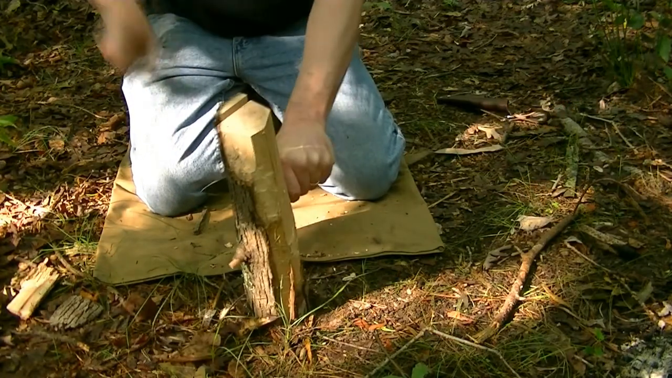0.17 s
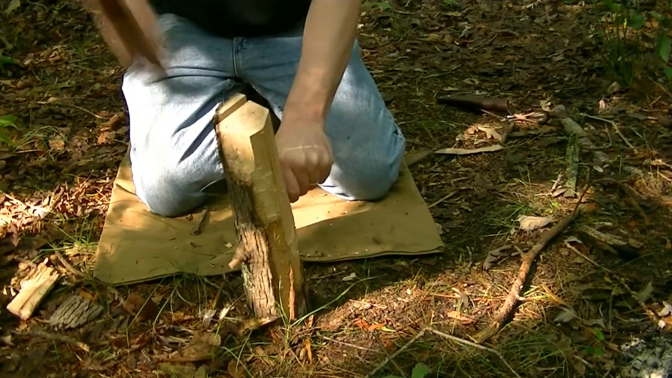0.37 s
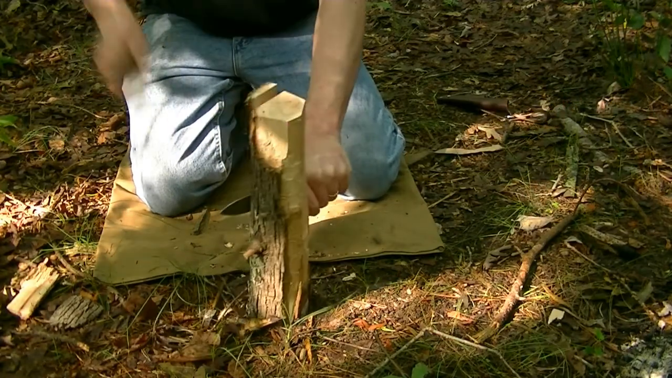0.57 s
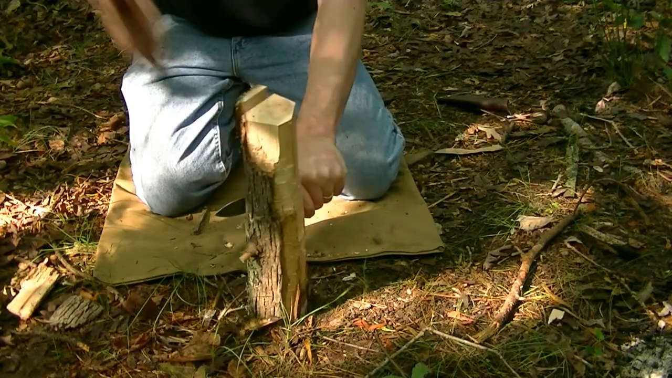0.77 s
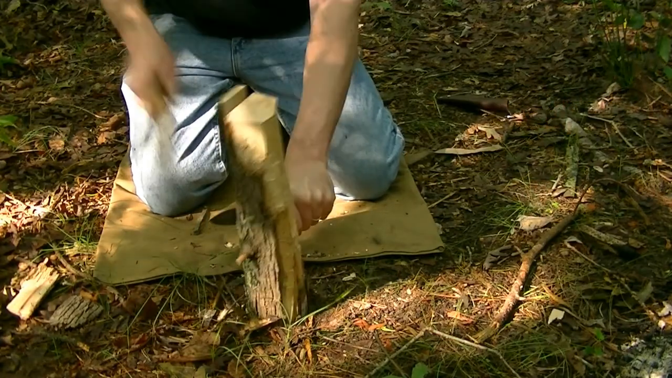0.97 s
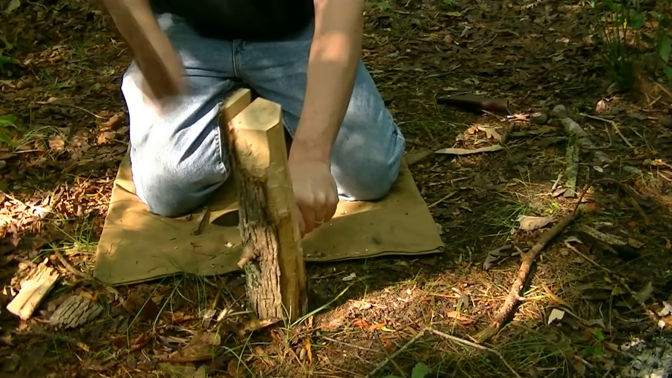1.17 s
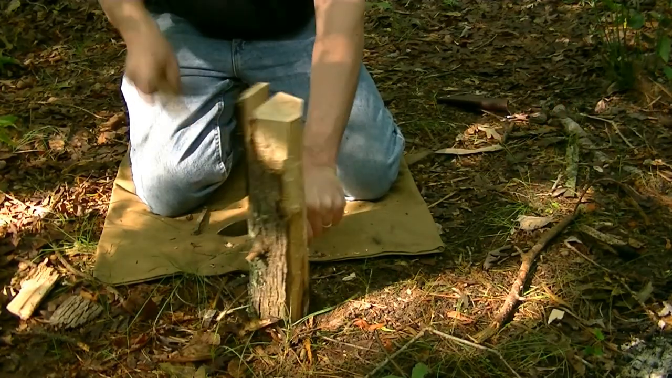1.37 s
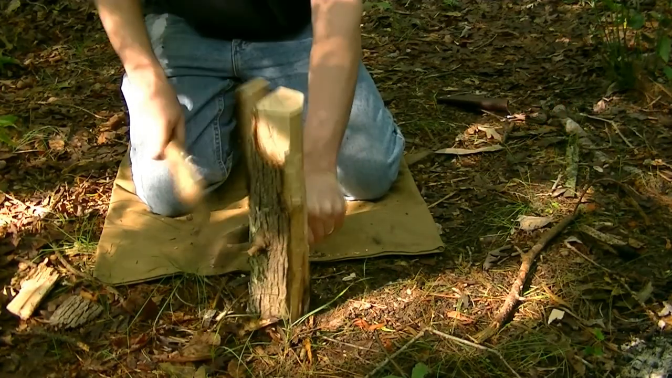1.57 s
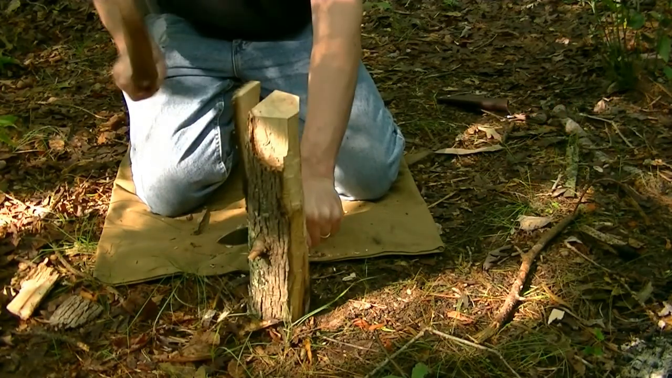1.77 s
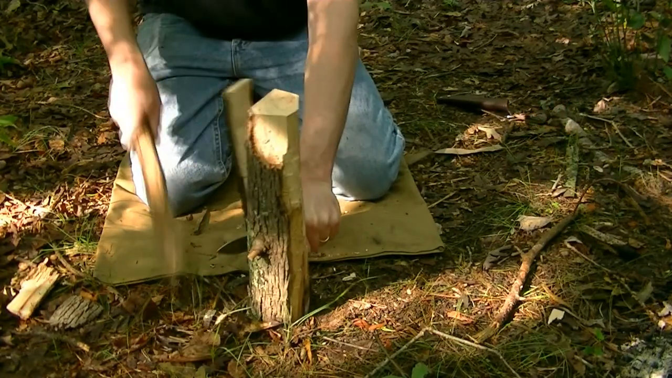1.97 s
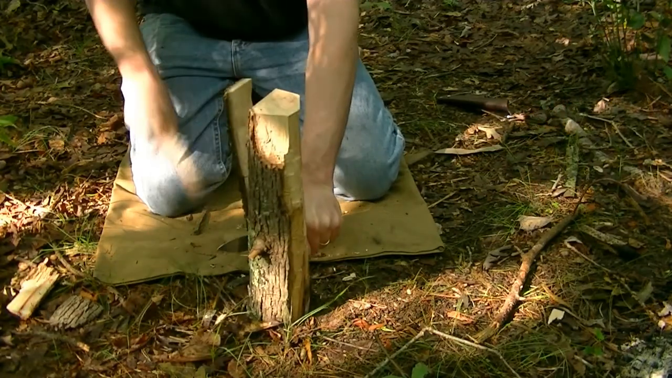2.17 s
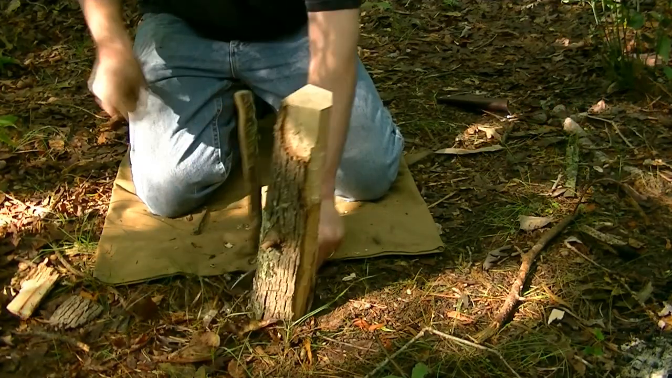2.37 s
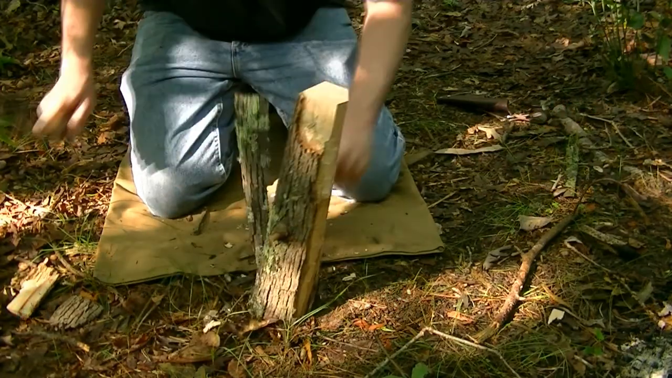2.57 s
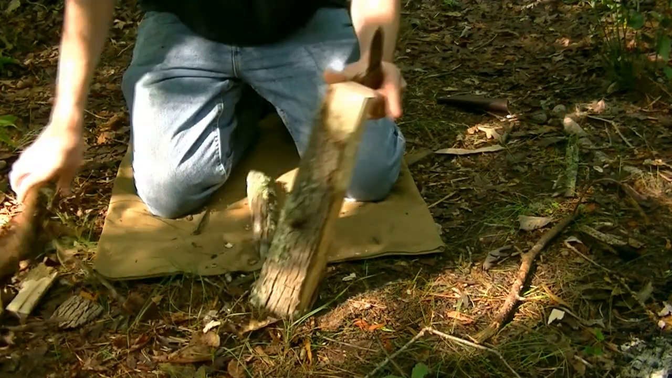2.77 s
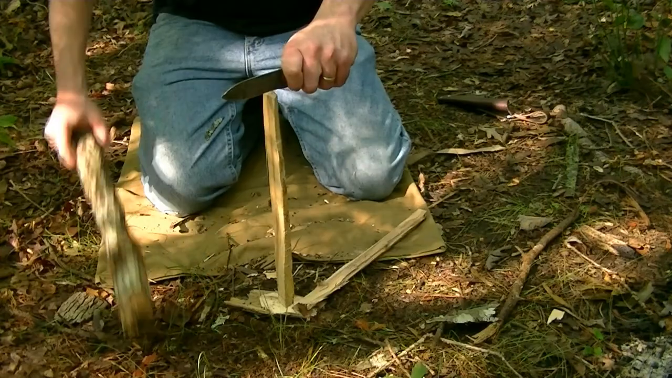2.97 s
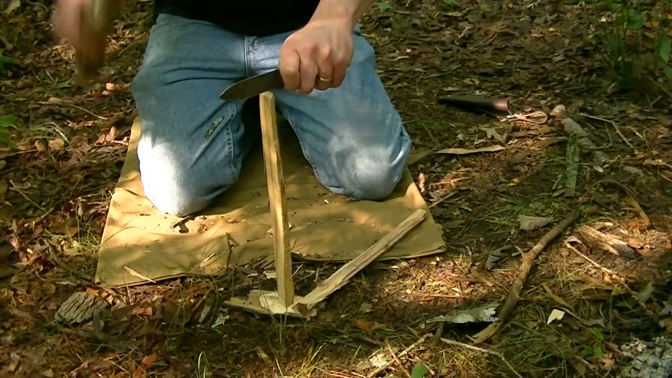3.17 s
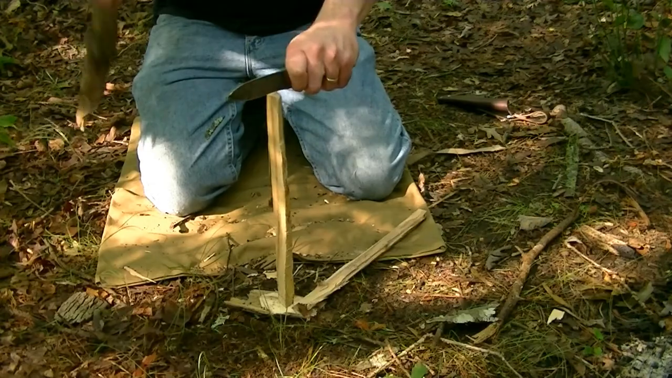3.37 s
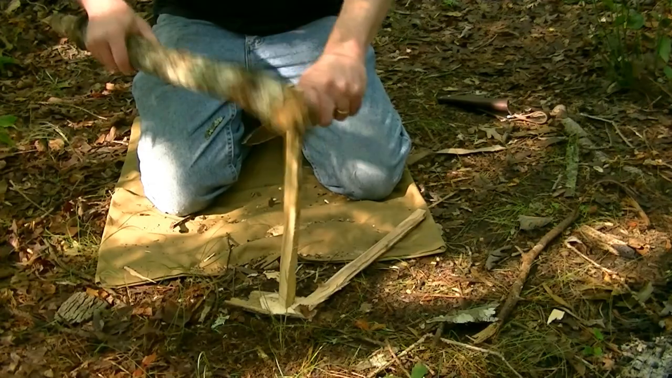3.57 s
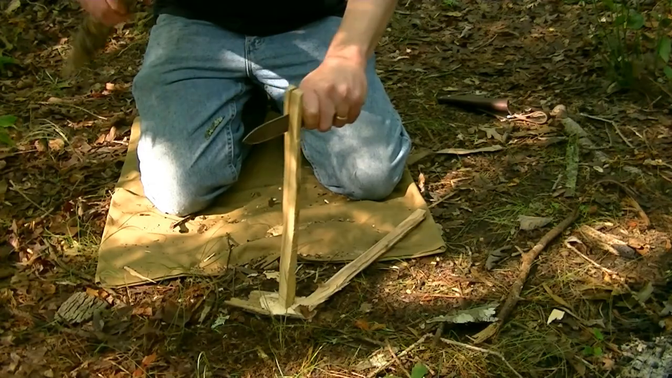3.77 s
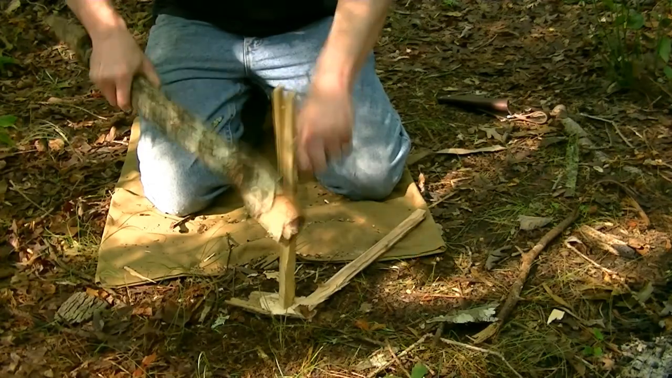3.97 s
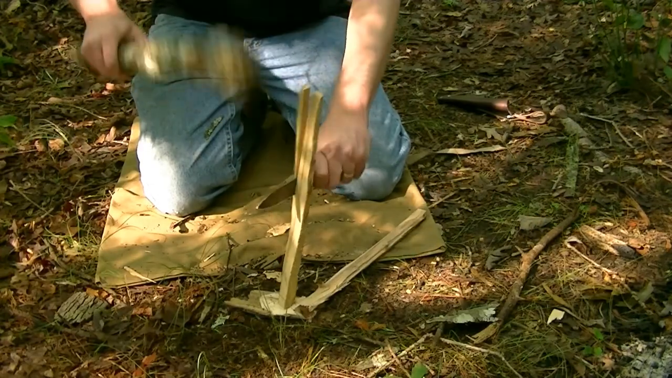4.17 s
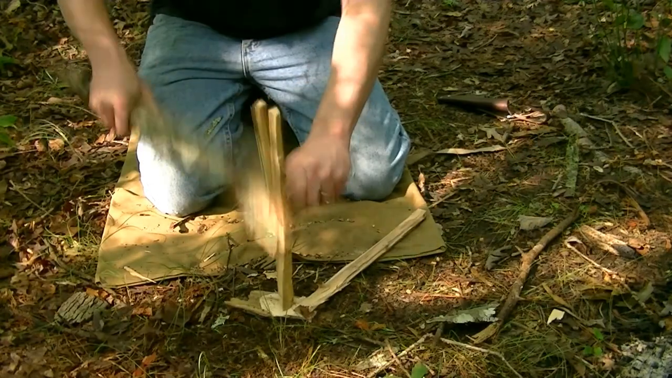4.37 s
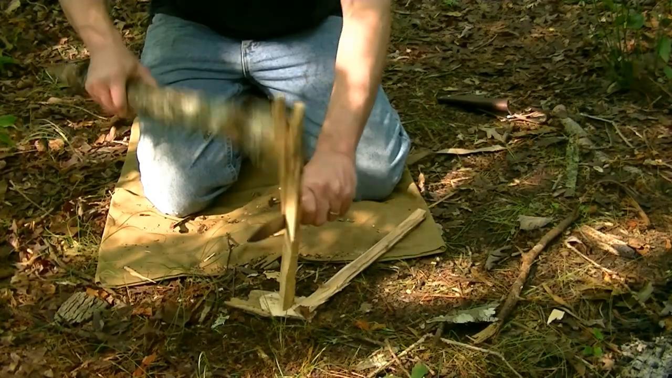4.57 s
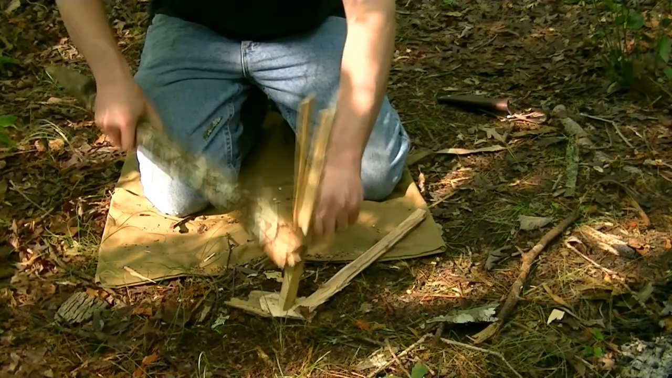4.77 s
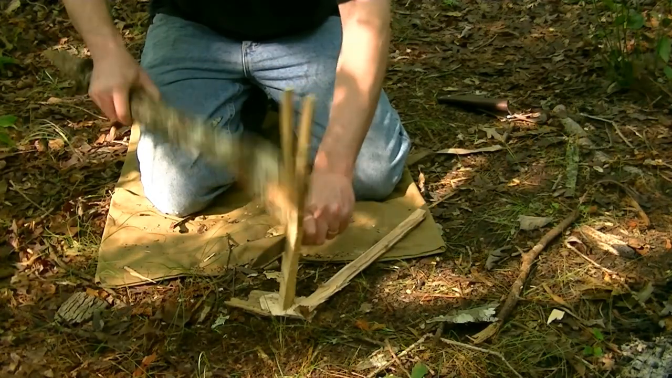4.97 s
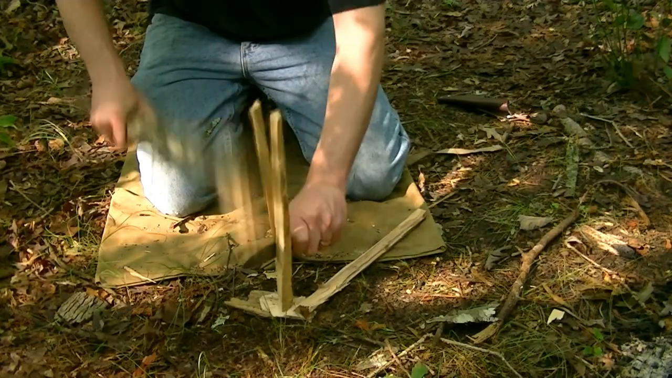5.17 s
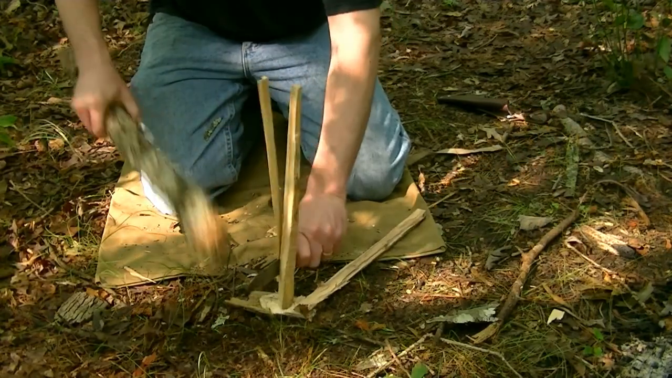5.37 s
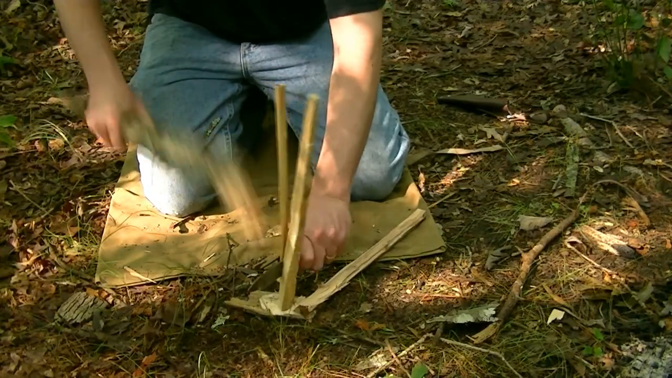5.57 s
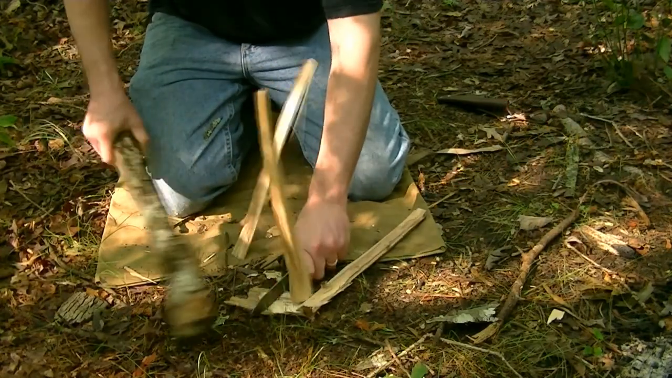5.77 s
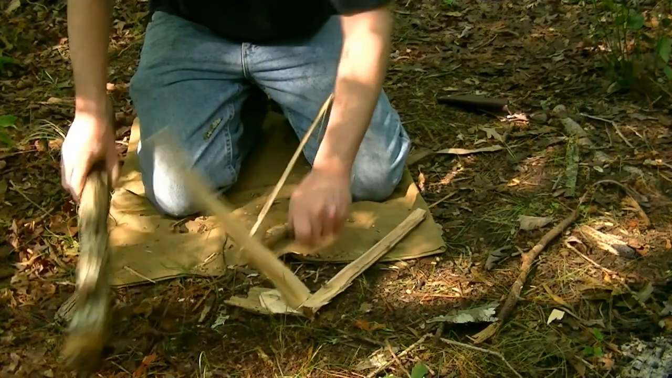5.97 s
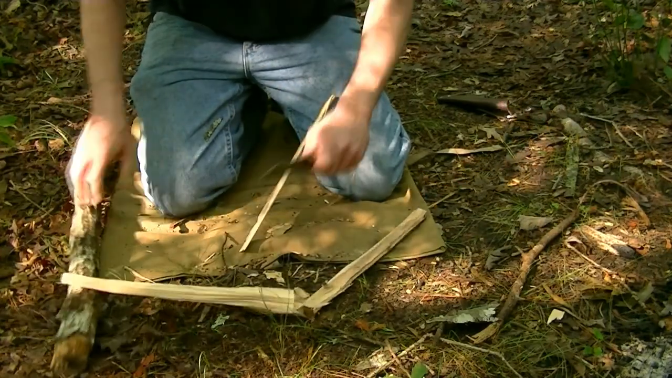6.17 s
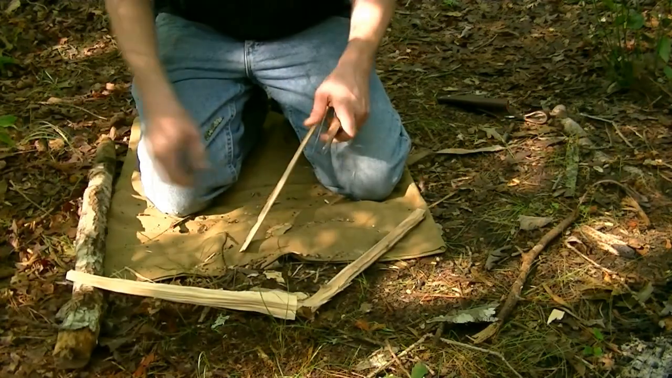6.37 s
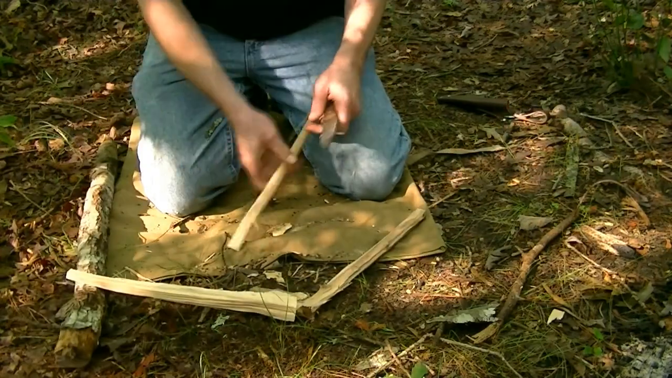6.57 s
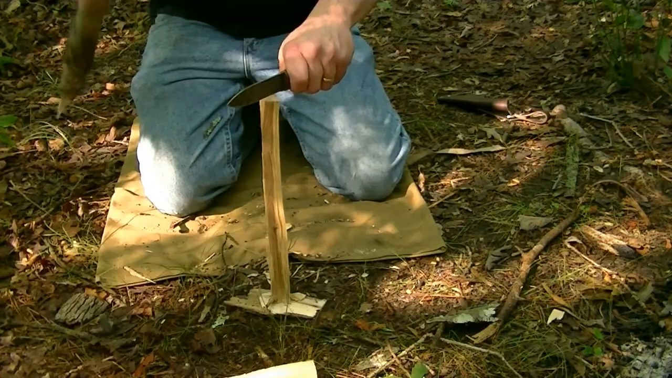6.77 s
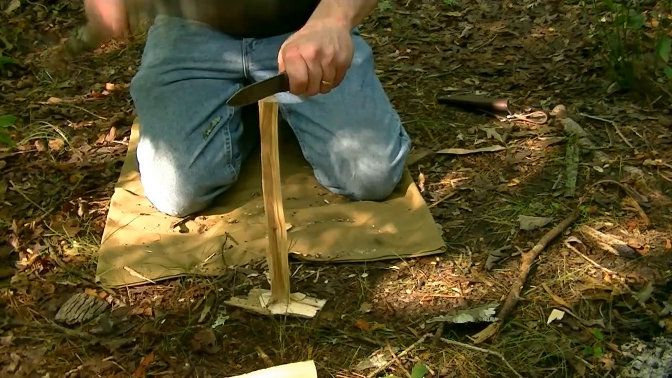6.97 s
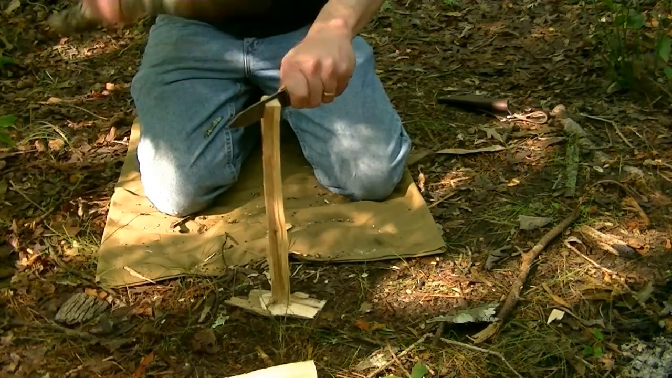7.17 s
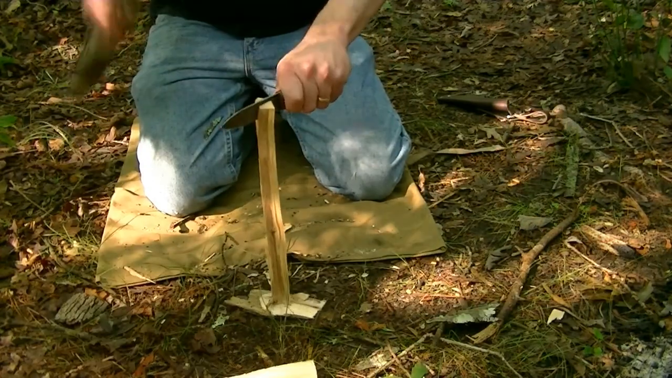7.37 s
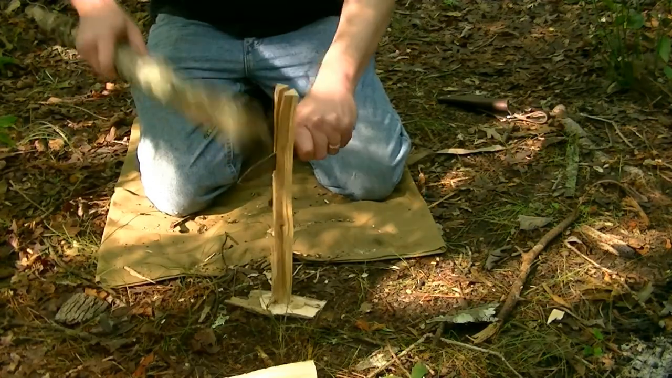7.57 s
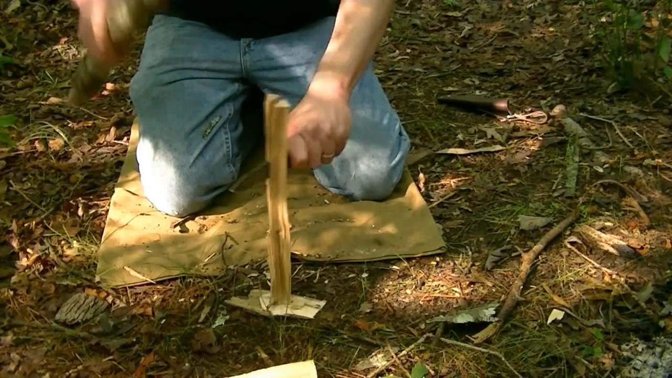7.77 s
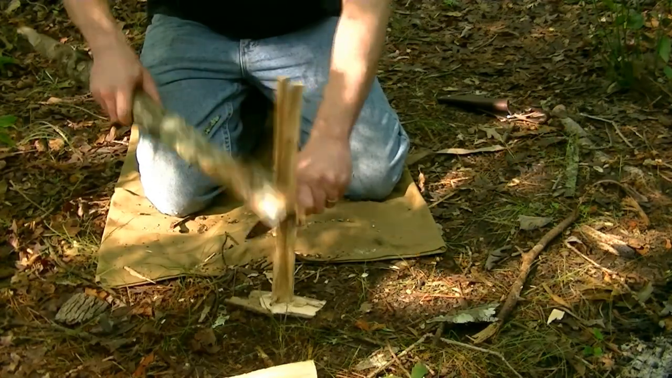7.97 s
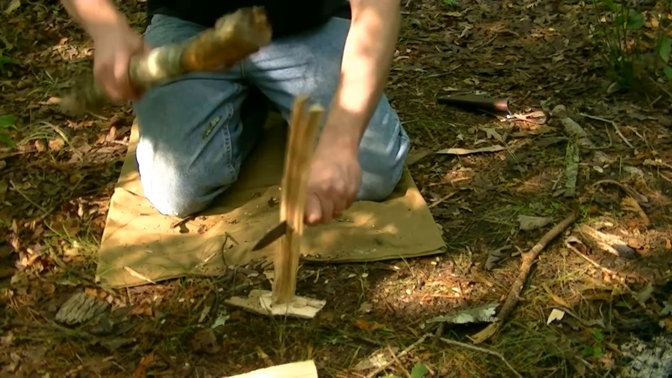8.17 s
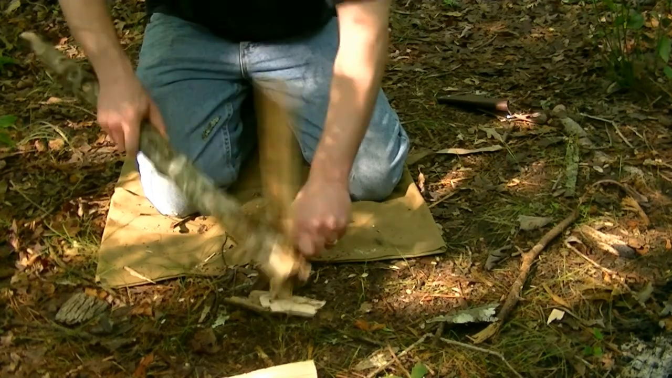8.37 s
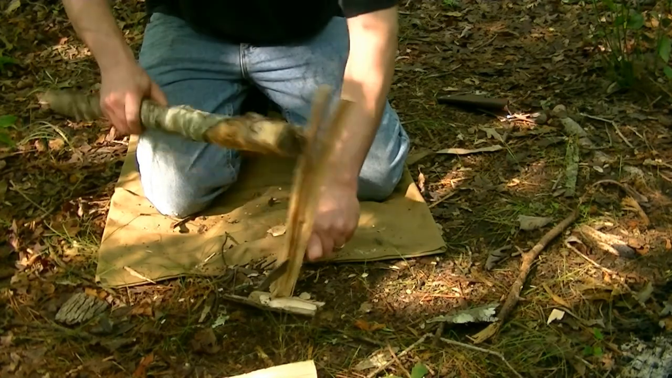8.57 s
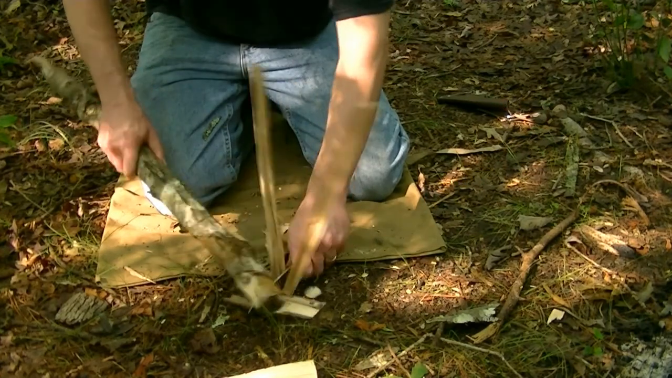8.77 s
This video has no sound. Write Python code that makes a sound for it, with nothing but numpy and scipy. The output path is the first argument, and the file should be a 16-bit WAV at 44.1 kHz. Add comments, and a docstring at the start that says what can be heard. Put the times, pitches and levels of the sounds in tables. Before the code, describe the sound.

Sharp, dry baton blows split wood at a steady pace outdoors, with crackling tears, loose clacks and a high insect chirr behind.

```python
"""Forest floor among trees, two microphone ports close to the work.
A wooden baton drives a knife through an upright log, then through thin sticks.
Blows ring decaying wood modes and thump the ground; fibres tear as dense filtered clicks; small knocks follow.
The trees return a faint echo of scattered clicks. Insects, pulsed narrow noise, chirr near 7 kHz
throughout; a broad insect hiss, coloured noise, is heard only up to an abrupt cut near 3 s."""
import sys
import numpy as np
from scipy import signal
from scipy.fft import rfft, irfft, next_fast_len
from scipy.io import wavfile

SR = 44100
rng = np.random.default_rng(int(sys.argv[2]) if len(sys.argv) > 2 else 0)


def pcm_store(signal):
    """Save signal as 16-bit PCM."""
    levels = np.round(np.clip(np.atleast_2d(signal), -1, 1) * 32767)
    wavfile.write(sys.argv[1], SR, levels.astype(np.int16).T)


N = 389403

# low, middle and high register of the wood: from_hz, to_hz
REGISTERS = [(280, 740), (960, 1770), (1950, 3360)]
# baton on the blade's back, in the log; bass and treble relative to the middle register:
# start_s, level_db, bass_db, treble_db, middle_mode_hz, high_mode_hz, high_mode_share (0-1),
# echo_send_db, graze_ahead_s
LOG_BLOWS = [(.0038, -25.5, 0, 1.5, 1085, 3050, .08, 0, 0.001),
             (0.4139, -21, -9, -3, 1560, 2950, 0.9, -5, 0.0016),
             (0.8319, -19, -16, -1, 1410, 2680, 0.56, -1, 0),
             (1.2053, -22, -6, -0.5, 1267, 2160, 0.58, -0.5, .003),
             (1.554, -22.5, -4.5, 1.5, 1296, 2240, 0, -1.5, 0.0022),
             (1.8687, -26, -3.5, 5, 1223, 2390, 0.16, 0, .004),
             (2.1903, -20.5, -9.5, -0.5, 1434, 2269, 0.03, -3, .0083)]
# the same in the sticks: start_s, level_db, bass_db, treble_db, middle_mode_hz, middle_mode_share (0-1),
# echo_send_db, tearing_db, tearing_length_s
STICK_BLOWS = [(3.47, -20.5, -7.5, -10, 1319, .25, 2, -37, .035),
               (3.9325, -20, -8.5, -4, 1560, 0.3, -1.5, -34, 0.043),
               (4.3721, -21, -8, .5, 1198, 0.3, -1, -37, 0.031),
               (4.7616, -24.5, 2, -2.5, 1300, .48, -4, -27, 0.013),
               (5.2033, -21, -4, -6, 1306, .5, -4.5, -34, 0.024),
               (5.613, -18.5, -9, -7.5, 1388, .12, -3.5, -35, 0.016),
               (6.978, -18, -12.5, -7.5, 1272, .88, -2, -61, .01),
               (7.4023, -23.5, -6.5, -1, 1248, 0.72, -3, -35, 0.041),
               (7.832, -24.5, -3.5, -13, 1690, 0.5, -5, -29.5, .027),
               (8.2536, -21.5, -6.5, -10, 1266, 0.89, -11, -34, .036),
               (8.68, -30, 3, -19.5, 1370, 0.34, -6, -35, 0.02)]
# light wooden knocks: loose pieces touching or landing, and a soft graze just before a blow:
# start_s, level_db, bass_db, treble_db, middle_mode_hz, high_mode_hz
LIGHT_KNOCKS = [(.905, -45, -7.5, -6, 1550, 2440), (2.236, -55.5, 11.5, 12, 1499, 2700),
                (2.285, -56.5, 7.5, 12.5, 1252, 2700), (2.717, -39.5, 4.5, 8, 1566, 2400),
                (2.796, -33, -4.5, -15, 1470, 2700), (5.748, -56.5, 5, 0, 1000, 2046),
                (6.008, -32, 2.5, -12.5, 1200, 1998), (6.047, -47, 3, 2.5, 1204, 2260),
                (6.1349, -21.5, -12, -13.5, 1225, 2110), (6.146, -37, 1, 1.5, 1620, 3225),
                (8.237, -40, -7, -6, 1292, 2110)]
# dull low wooden knocks: heavy wood bumping down, and the low ring of a late blow;
# knock and thump relative to the level:
# start_s, level_db, low_mode_hz, low_mode_share (0-1), knock_db, thump_db
DULL_KNOCKS = [(2.7219, -24.5, 280, 0.28, -14, -11), (2.911, -39, 398, .1, -22, -12),
               (5.102, -45, 291, 0.64, -1.5, -3), (5.1165, -36, 286, 0.66, -14.5, -6.5),
               (5.6282, -35.5, 388, .44, 0, -7), (6.045, -46.5, 231, .3, -4, 11),
               (8.698, -34.5, 443, 0.74, -14, -11.5)]
# ringing modes of the log, the sticks, and the light and dull knocks, before random changes of strength:
# pitch_hz, relative_db, t60_s
LOG_MODES = [(600, -5, 0.033), (747, 4, 0.043), (894, 4.5, 0.017), (1251, -12.5, 0.033), (1510, -10, 0.02),
             (1790, 3.5, 0.024), (1970, -7.5, 0.0028), (2440, 1.5, 0.015), (2800, -11, 0.025),
             (3100, -26, 0.013)]
STICK_MODES = [(453, -3.5, .04), (584, 0, 0.027), (762, 1.5, 0.02), (1216, 0, 0.022), (1380, -7.5, 0.029),
               (1665, 2, 0.028), (2220, 3.5, 0.014), (2320, 0.5, 0.03), (2860, -1, 0.023),
               (3290, -15.5, 0.05)]
SMALL_KNOCK_MODES = [(305, 0.5, 0.014), (477, -4.5, 0.082), (634, -7.5, .04), (816, -5, 0.022),
                     (1296, -6, 0.11), (1480, 2, 0.09), (1730, 0, 0.03), (2200, -9.5, 0.047),
                     (2620, -12, .04), (3240, 2.5, 0.079)]
# the log gives way: start_s, level_db, length_s
LOG_SPLIT = (2.186, -43.5, .046)
# thick fibres and twigs snapping, before the common snap gain: start_s, relative_db
SNAPS = [(1.91, -23.5), (3.4726, -9), (3.493, -18), (3.959, -15.5), (5.619, -9.5), (5.779, -31),
         (5.895, -31), (7.415, -8), (7.8337, -9), (7.8402, -11), (7.855, -17), (7.87, -16.5), (8.24, -27),
         (8.2713, -9), (8.371, -18), (8.697, -11.5), (8.755, -22)]
# knees and hands stir the dry litter: start_s, level_db, hold_s
STIRS = [(0, -57, .2), (2.712, -47, 0.053), (5.107, -51.5, 0.017), (5.744, -50.5, .03),
         (6.02, -47.5, 0.011), (6.584, -66.5, 0.021), (8.76, -57.5, 0.036)]
# noise colours of tearing fibre, crushed bark, dry litter, tree echo, forest air and insect hiss:
# frequency_hz, relative_db
FIBRE = [(60, -32), (600, -8), (1500, -3), (3000, -5), (4200, -7), (6000, 3.5), (8000, -0.5), (10500, 0),
         (12800, -1.5), (14500, -14), (16000, -21.5)]
CRACK = [(60, -42), (400, -23), (2500, -24.5), (3700, -1), (4600, -1.5), (6000, 0.5), (8000, -6.5),
         (11500, -5), (13500, -11), (16000, -26)]
NEEDLES = [(200, -9.5), (450, 0), (1200, -1), (3000, 0.5), (4500, -4), (6500, -2), (9000, -6),
           (12000, -11.5), (16000, -29)]
ECHO = [(100, -18.5), (400, -13.5), (800, -6.5), (1300, -4), (2000, 1), (2800, 1.5), (4000, 0.5),
        (7000, -10), (12000, -3), (16000, -20.5)]
AIR = [(20, -15.5), (60, -4), (125, 2), (220, -2), (520, 1), (750, -4.5), (1200, -7), (1700, -12),
       (2600, -13.5), (3500, -4), (4100, -7.5), (6100, -2.5), (9000, -35), (14000, -21), (15200, -51.5)]
HISS = [(300, -24.5), (800, -9), (2300, -15), (3000, -7), (3500, -1.5), (4300, -0.5), (5000, 1),
        (5800, 1.5), (7200, -3), (8300, -0.5), (9300, -14.5), (10500, -13.5), (13000, -23), (15000, -37.5)]
# chirring insects, before a common gain: pitch_hz, width_hz, relative_db, pulses_per_s
INSECTS = [(7014, 140, -56.5, 340), (6780, 290, -60, 290), (7420, 270, -62.5, 370), (6550, 210, -65.5, 260),
           (6350, 80, -66.5, 100)]
# thin insect tones within the hiss: pitch_hz, width_hz, level_db, pulses_per_s
HISS_TONES = [(4815, 69, -62, 380), (7200, 70, -66.5, 340)]
# left-right likeness of air, hiss and close sound: frequency_hz, likeness (-1 opposed to 1 alike)
AIR_LIKENESS = [(60, -0.31), (150, -0.03), (380, -0.67), (950, -0.66), (2380, 0.19), (5980, -0.7),
                (15000, 0.79)]
HISS_LIKENESS = [(60, -0.25), (240, -0.57), (950, -0.24), (3770, -0.49), (15000, -0.53)]
HIT_LIKENESS = [(100, 1), (1000, 0.94), (2200, 0.86), (4500, 0.92), (8000, .85), (13000, 0.38)]
# balance of close sound: frequency_hz, left_over_right_db
HIT_BALANCE = [(100, 0.4), (500, 1.05), (1200, 2), (2500, 2.5), (5000, 0.5), (8500, 2.5), (12500, -2)]

HIT_SIZE = SR // 6  # samples kept of each short sound
LEVEL_WINDOW_S = .02  # short sounds are levelled as if their energy filled this time
TIME = np.arange(N) / SR
AGE = TIME[:HIT_SIZE]
GRAZE_LOSS_DB_PER_S = 1697.5  # a loose blade is touched before the blow; the earlier, the lighter
# the first blow seats a new stick in the ground; each later one keeps a share of the extra thump dB
THUMP_DB, SEATING_DB, SEATING_KEPT, NEW_STICK_PAUSE_S = -42.5, 12.5, 0.24, 1
REPEAT_S, REPEAT_LOSS_DB = .076, 27  # each light knock is followed by one much fainter repeat
TEAR_LEAD_S = .0035  # fibres start to give just before the knock
# thinner fibres: offset from the tear's level before the snap gain, reach in tear lengths
SMALL_SNAP_DB, SMALL_SNAP_REACH = 1, 1.6
STIR_RISE_DB_PER_S, STIR_FALL_DB_PER_S, LITTER_REST_DB = 328.5, 171.5, -83.5
BLADE_HZ, BLADE_T60_S, BLADE_HELD_DB, BLADE_FREED_DB = 2690, .7, -55, -37
HISS_END_S, RUMBLE_HZ, CUTOFF_HZ = 2.945, 45, 16800


def log_blows(bass_hz, bass_share, middle_share, thump_db, crack_db):
    """Hard blows into the thick log, some led by a lighter graze."""
    for s, db, bass_db, treble_db, middle_hz, high_hz, share, echo_db, graze_s in LOG_BLOWS:
        pitches = (bass_hz, middle_hz, high_hz)
        shares = (bass_share, middle_share, share)
        for ahead_s in [0, graze_s] if graze_s > 0 else [0]:
            loss = GRAZE_LOSS_DB_PER_S * ahead_s
            levels = db - loss + np.array([bass_db, 0, treble_db])
            yield s - ahead_s, echo_db, thump_db - loss, crack_db - loss, levels, pitches, shares


def stick_blows(bass_hz, high_hz, bass_share, high_share, crack_db):
    """Runs of blows into thin sticks; the thump shrinks once a stick is seated."""
    last_s, seating_db = 0, 0
    for s, db, bass_db, treble_db, middle_hz, share, echo_db, _, _ in STICK_BLOWS:
        new_stick = s - last_s > NEW_STICK_PAUSE_S
        seating_db = SEATING_DB if new_stick else seating_db * SEATING_KEPT
        last_s = s
        levels = db + np.array([bass_db, 0, treble_db])
        pitches = (bass_hz, middle_hz, high_hz)
        shares = (bass_share, share, high_share)
        yield s, echo_db, THUMP_DB + seating_db, crack_db, levels, pitches, shares


def light_knocks(bass_hz, shares, echo_db, thump_db, crack_db):
    """Light wooden knocks ring clearly, each with one much fainter repeat."""
    for s, db, bass_db, treble_db, middle_hz, high_hz in LIGHT_KNOCKS:
        pitches = (bass_hz, middle_hz, high_hz)
        for late_s, loss in (0, 0), (REPEAT_S, REPEAT_LOSS_DB):
            levels = db - loss + np.array([bass_db, 0, treble_db])
            top_db = levels.max()
            yield s + late_s, echo_db, top_db + thump_db, top_db + crack_db, levels, pitches, shares


def dull_knocks(middle_hz, high_hz, middle_share, high_share, treble_db, echo_db, crack_db):
    """Dull low wooden knocks, each with a short higher knock on top."""
    for s, db, low_hz, share, knock_db, thump_db in DULL_KNOCKS:
        levels = db + np.array([0, knock_db, treble_db])
        pitches = (low_hz, middle_hz, high_hz)
        shares = (share, middle_share, high_share)
        yield s, echo_db, db + thump_db, db + crack_db, levels, pitches, shares


def knocks(contacts, modes, body_hz, contact_db, grit_db, grit_t60, main_t60, crack_t60,
           thump_hz, thump_t60, soil_db, echo_tone, echo_treble_db):
    """Each contact rings the wood; bark crushes with a crack and the ground takes the push.
    A contact is start_s, echo_db, thump_db, crack_db, then by register levels_db, pitches_hz, shares (0-1).
    Row 0 is the sound straight ahead, row 1 the sound sent all around."""
    ahead, around = np.zeros((2, N))
    contact = unit_hit(dying(0.00076))
    # neighbouring registers swing in opposite phase, so they join without a gap
    filters = [(sign, signal.butter(2, edges, "band", fs=SR, output="sos"))
               for sign, edges in zip((1, -1, 1), REGISTERS)]
    for s, echo_db, thump_db, crack_db, levels, pitches, shares in contacts:
        strengths = rng.normal(0, 7.4, len(modes))  # dB
        wood = sum(from_db(db + extra_db) * ring(hz, t60)
                   for (hz, db, t60), extra_db in zip(modes, strengths))
        grit = rng.standard_normal((3, HIT_SIZE))
        # one hard pulse starts the knock; between the clear modes lie many faint, quickly damped ones
        faint_modes = from_db(grit_db) * unit_hit(grit[0] * dying(grit_t60))
        wood = unit_hit(wood) + from_db(contact_db) * contact + faint_modes
        # a narrow piece radiates little below its body frequency
        wood = band(wood, body_hz, 9000)
        sends = echo_db + np.array([0, 0, echo_treble_db])
        for db, hz, share, sent_db, (sign, sos) in zip(levels, pitches, shares, sends, filters):
            # one bending mode leads each register
            share = np.clip(share, 0, 1)
            lead = unit_hit(ring(hz, main_t60 * (1300 / hz) ** 0.35) * (1 - dying(0.0023)))
            rest = unit_hit(signal.sosfilt(sos, wood))
            tone = unit_hit(np.sqrt(share) * lead + np.sqrt(1 - share) * rest)
            add(ahead, s, sign * from_db(db) * tone)
            # summed over all directions the modes even out
            even = unit_hit(signal.sosfilt(sos, contact + 1e-18))
            add(around, s, sign * from_db(db + sent_db) * unit_hit(echo_tone * tone + even))
        crack = from_db(crack_db) * unit_hit(colour(grit[1] * dying(crack_t60), CRACK))
        soil = from_db(soil_db) * unit_hit(band(grit[2] * dying(0.12), 99, 230))
        thump = unit_hit(ring(thump_hz, thump_t60) * (1 - dying(0.059))) + soil
        add(ahead, s, crack + from_db(thump_db) * unit_hit(band(thump, 85, 700)))
        add(around, s, crack)
    return np.array([ahead, around])


def splitting(fibres_per_s, spread_db, fade_t60, snap_t60, snap_db, count):
    """The split runs as a dense crackle; thicker fibres let go with single snaps."""
    out, snaps = np.zeros(N), list(SNAPS)
    stick_tears = [(s - TEAR_LEAD_S, db, length) for s, *_, db, length in STICK_BLOWS]
    for s, db, length in [LOG_SPLIT] + stick_tears:
        fading = from_db(-60 * np.maximum(AGE - length, 0) / fade_t60)
        running = (1 - dying(0.023)) * fading
        crackle = rms_one(colour(grains(HIT_SIZE, fibres_per_s, spread_db), FIBRE))
        add(out, s, from_db(db) * running * crackle)
        snaps += [(s + SMALL_SNAP_REACH * length * along, db + SMALL_SNAP_DB) for along in rng.random(count)]
    for s, db in snaps:
        snap = colour(rng.standard_normal(HIT_SIZE) * (dying(snap_t60) + 0.2 * dying(.035)), FIBRE)
        add(out, s, from_db(db + snap_db) * unit_hit(snap))
    return out


def litter():
    """Needles and dry leaves crackle under shifting weight; each stir swells, holds and settles."""
    level = from_db(LITTER_REST_DB)
    for s, db, hold in STIRS:
        rise_db = STIR_RISE_DB_PER_S * np.maximum(s - TIME, 0)
        fall_db = STIR_FALL_DB_PER_S * np.maximum(TIME - s - hold, 0)
        level = level + from_db(db - rise_db - fall_db)
    return level * rms_one(colour(grains(N, 620, 5.6), NEEDLES))


def at_ports(x):
    """Close sound reaches the two microphone ports with slightly different scatter and colour."""
    scatter = rms_one(rng.standard_normal(SR // 200)) / np.sqrt(SR // 200)
    side = signal.fftconvolve(x, scatter)[:N]
    left, right = widen(x, side, HIT_LIKENESS)
    size = next_fast_len(N, True)
    lean = from_db(at_hz(HIT_BALANCE, size) / 2)
    return irfft([rfft(left, size) * lean, rfft(right, size) / lean], size)[:, :N]


def blade(width_hz):
    """The steel's ring lingers among the trees: faint while the log grips it, clear when the log lets go."""
    out, age = np.zeros((2, N)), TIME[:SR]
    for s, *_ in LOG_BLOWS:
        db = BLADE_FREED_DB if s == LOG_BLOWS[-1][0] else BLADE_HELD_DB
        for side in out:
            noise = rng.standard_normal(SR)
            scattered = rms_one(band(noise, BLADE_HZ - width_hz / 2, BLADE_HZ + width_hz / 2))
            add(side, s, scattered * from_db(db - 60 * age / BLADE_T60_S))
    return out


def forest(x, echo_db, t60, swell_s, near_db, near_t60):
    """Ground and near trunks scatter early; far trunks return a thin tail that swells a little later."""
    age = TIME[:SR]
    trunks = np.array([rms_one(grains(SR, 5000, 5.3)) for _ in range(3)])
    # the third set of reflections is shared by both sides
    trunks = colour(trunks[:2] + 0.51 * trunks[2], ECHO)
    far = from_db(echo_db - 60 * age / t60) * (1 - np.exp(-(age / swell_s) ** 2))
    near = from_db(near_db - 60 * age / near_t60)
    response = trunks * (far + near) * (age > .008)  # nothing returns in the first 8 ms
    return signal.fftconvolve(x[None], response, axes=1)[:, :N]


def chirring(table, unevenness):
    """Many insects pulse their narrow resonances, out of step and from all sides."""
    out = np.zeros((2, N))
    for hz, width_hz, db, per_s in table:
        rate = per_s * (1 + unevenness * rng.standard_normal(N))
        phase = 2 * np.pi * np.cumsum(rate) / SR
        pulses = rng.standard_normal((2, N)) * (1 + 0.58 * np.sin(phase))
        # two resonators in a row narrow the band, so each is made 1.5 times as wide
        r = np.exp(-np.pi * 1.5 * width_hz / SR)
        poles = [1, -2 * r * np.cos(2 * np.pi * hz / SR), r * r]
        once = signal.lfilter([1], poles, pulses)
        out += from_db(db) * rms_one(signal.lfilter([1, 0, -1], poles, once))
    return out


def stereo_noise(spectrum, likeness):
    """Diffuse steady noise, rms 1, for the air and the insect hiss."""
    mid, side = colour(rng.standard_normal((2, N)), spectrum)
    return rms_one(widen(mid, side, likeness))


def widen(mid, side, likeness):
    """Two ports hear a common part and an opposed part, by frequency."""
    size = next_fast_len(N, True)
    alike = np.clip(at_hz(likeness, size), -.99, .99)
    common = rfft(mid, size) * np.sqrt((1 + alike) / 2)
    opposed = rfft(side, size) * np.sqrt((1 - alike) / 2)
    return irfft([common + opposed, common - opposed], size)[:, :N]


def from_db(db):
    """Decibels to gain."""
    return 10 ** (np.asarray(db) / 20)


def rms_one(x):
    """Scale to rms 1."""
    return x / np.sqrt(np.mean(x ** 2) + 1e-20)


def unit_hit(x):
    """Scale a short sound to the energy of rms 1 over the level window."""
    return x * np.sqrt(LEVEL_WINDOW_S * SR / (np.sum(x ** 2) + 1e-20))


def at_hz(points, size):
    """A frequency table read on the FFT grid of this size, along log frequency."""
    hz, value = np.transpose(points)
    return np.interp(np.log(np.fft.rfftfreq(size, 1 / SR) + 0.0012), np.log(hz), value)


def colour(x, spectrum):
    """Causal (minimum-phase) filter with the given spectrum."""
    size = 2 * next_fast_len(x.shape[-1] // 2 + HIT_SIZE // 8, True)
    cepstrum = irfft(np.log(from_db(at_hz(spectrum, size))))
    # folding the cepstrum forward makes the phase minimal
    cepstrum[1:size // 2] *= 2
    cepstrum[size // 2 + 1:] = 0
    return irfft(rfft(x, size) * np.exp(rfft(cepstrum)))[..., :x.shape[-1]]


def band(x, low_hz, high_hz):
    """Causal band-pass."""
    return signal.sosfilt(signal.butter(2, [low_hz, high_hz], "band", fs=SR, output="sos"), x + 1e-18)


def dying(t60):
    """Envelope that loses 60 dB in t60 seconds."""
    return from_db(-60 * AGE / t60)


def ring(hz, t60):
    """One struck mode: a decaying sine."""
    return np.sin(2 * np.pi * hz * AGE) * dying(t60)


def grains(size, per_s, spread_db):
    """Random clicks of uneven strength."""
    born = rng.random(size) < per_s / SR
    signs = rng.choice([-1, 1], size)
    return born * signs * from_db(spread_db * np.minimum(rng.exponential(1, size), 4))


def add(track, s, sound):
    """Mix a short sound into a track at time s."""
    i = max(0, round(s * SR))
    track[i:i + len(sound)] += sound[:N - i]


def scene():
    """Woodwork close by, its echo, and the insects around."""
    on_log = log_blows(bass_hz=822, bass_share=.45, middle_share=.28, thump_db=-47.5, crack_db=-28)
    on_sticks = stick_blows(bass_hz=754, high_hz=2127, bass_share=.42, high_share=0.29, crack_db=-35.0)
    small = [*light_knocks(bass_hz=796, shares=(.65, .9, .8), echo_db=-3, thump_db=-21, crack_db=-23.5),
             *dull_knocks(middle_hz=1460, high_hz=3180, middle_share=0.33, high_share=.35,
                          treble_db=-8.5, echo_db=-2, crack_db=-12.5)]
    log = knocks(on_log, LOG_MODES, body_hz=400, contact_db=5.5, grit_db=13.5, grit_t60=0.022,
                 main_t60=0.026, crack_t60=0.026, thump_hz=210, thump_t60=0.04, soil_db=1.5,
                 echo_tone=.18, echo_treble_db=3)
    sticks = knocks(on_sticks, STICK_MODES, body_hz=298, contact_db=-2.5, grit_db=5.0, grit_t60=0.02,
                    main_t60=0.031, crack_t60=0.042, thump_hz=137.4, thump_t60=0.072, soil_db=-1.0,
                    echo_tone=0.28, echo_treble_db=-1.5)
    small_knocks = knocks(small, SMALL_KNOCK_MODES, body_hz=137.2, contact_db=-12.0, grit_db=14.5,
                          grit_t60=.05, main_t60=0.053, crack_t60=0.042, thump_hz=157, thump_t60=0.045,
                          soil_db=5, echo_tone=.6, echo_treble_db=-2.5)
    tearing = splitting(fibres_per_s=9800, spread_db=0.5, fade_t60=0.064, snap_t60=0.007,
                        snap_db=-20.5, count=3)
    # tearing and litter go equally ahead and all around
    ahead, around = log + sticks + small_knocks + tearing + litter()
    echo = forest(around, echo_db=-56, t60=0.81, swell_s=.045, near_db=-44.5, near_t60=0.25)
    steel = blade(width_hz=160)
    air = from_db(-56.0) * stereo_noise(AIR, AIR_LIKENESS)
    hiss = from_db(-44.5) * stereo_noise(HISS, HISS_LIKENESS) + chirring(HISS_TONES, unevenness=2.0)
    # the hiss and its thin tones are cut off abruptly
    hiss_gate = np.clip((HISS_END_S - TIME) / 0.0038, 0, 1)
    insects = from_db(3.0) * chirring(INSECTS, unevenness=7.0)
    return at_ports(ahead) + echo + steel + air + hiss_gate * hiss + insects


def gain_control(x, threshold_db, slope, release_db_per_s, attack_s):
    """Loud peaks pull the gain of both channels down a little, and it creeps back."""
    peak_db = 20 * np.log10(np.abs(x).max(axis=0) + 1e-9)
    over = slope * np.maximum(peak_db - threshold_db, 0)
    held = np.maximum.accumulate(over + release_db_per_s * TIME) - release_db_per_s * TIME
    r = np.exp(-1 / (attack_s * SR))
    return x * from_db(-signal.lfilter([1 - r], [1, -r], held))


def record(dry):
    """The microphone chain: rumble filter, gain control, rounded peaks, and the top cut."""
    x = signal.sosfilt(signal.butter(1, RUMBLE_HZ, "high", fs=SR, output="sos"), dry)
    x = gain_control(x, threshold_db=-19, slope=0.11, release_db_per_s=19.5, attack_s=0.033)
    x = x / (1 + x ** 6) ** (1 / 6)
    return signal.sosfilt(signal.cheby2(14, 70, CUTOFF_HZ, fs=SR, output="sos"), x)


dry = scene()
out = record(dry)
pcm_store(out)
```